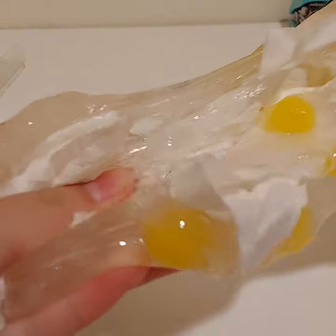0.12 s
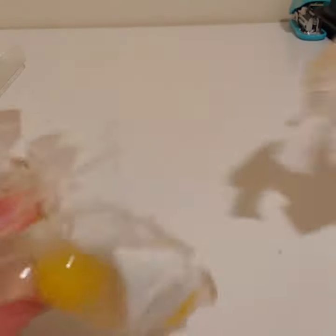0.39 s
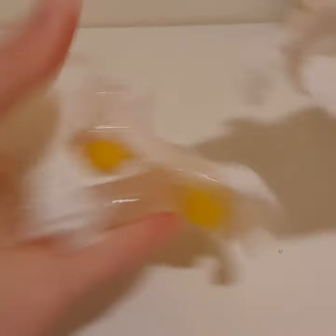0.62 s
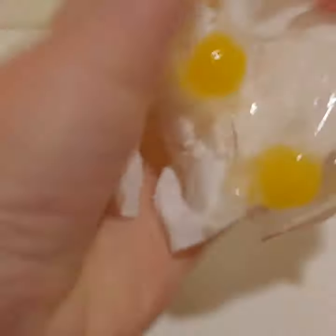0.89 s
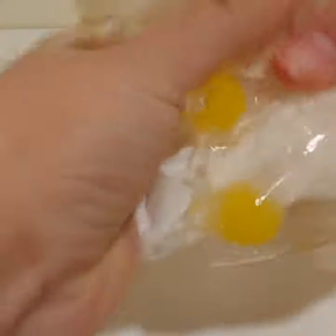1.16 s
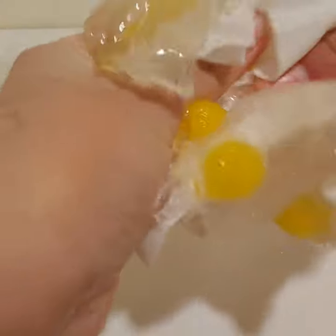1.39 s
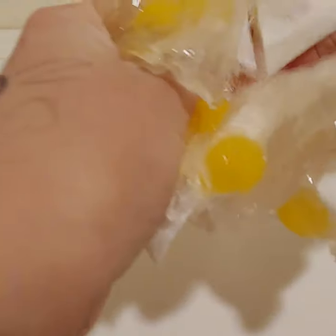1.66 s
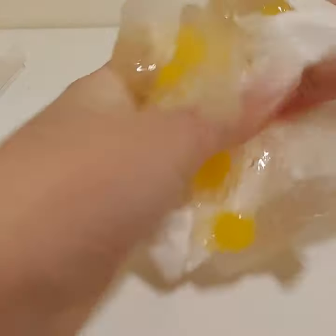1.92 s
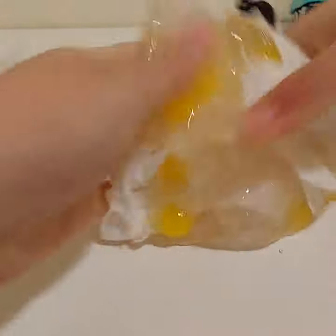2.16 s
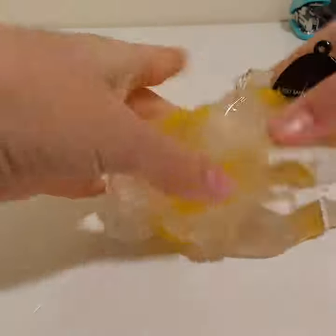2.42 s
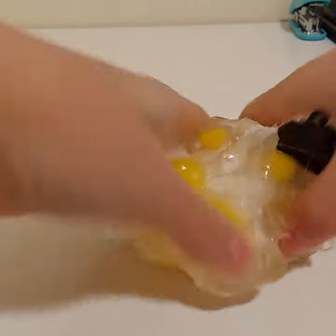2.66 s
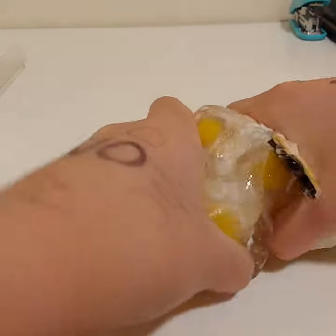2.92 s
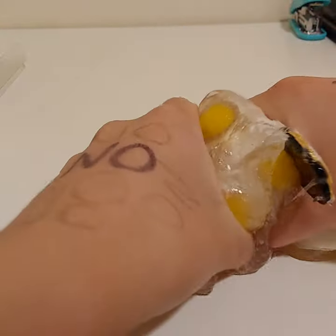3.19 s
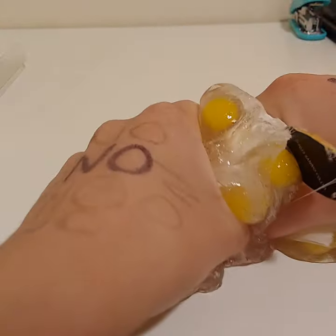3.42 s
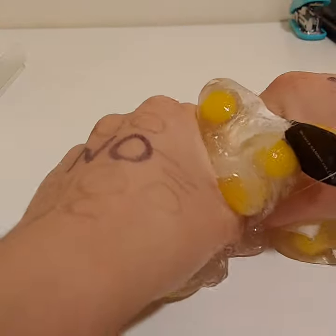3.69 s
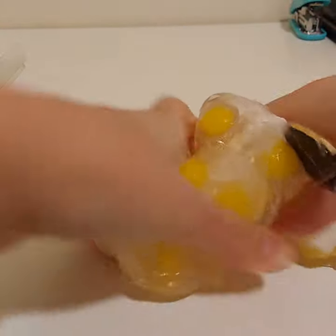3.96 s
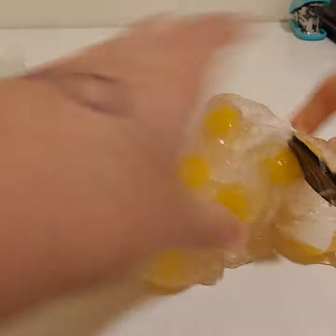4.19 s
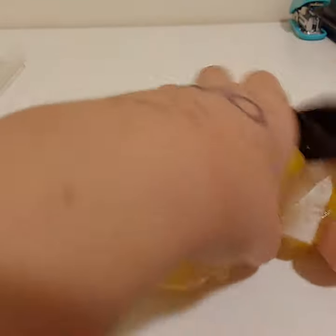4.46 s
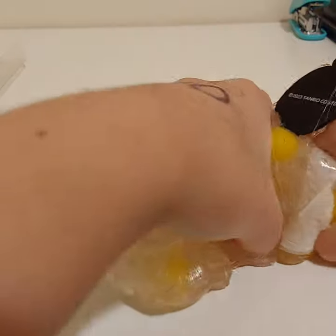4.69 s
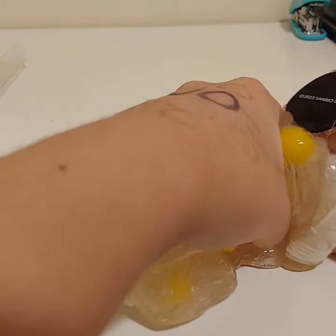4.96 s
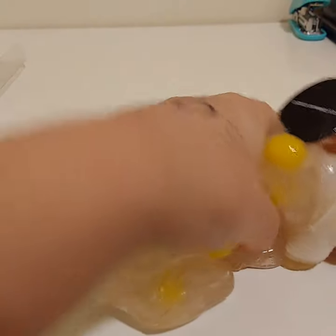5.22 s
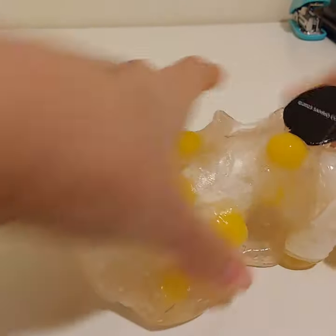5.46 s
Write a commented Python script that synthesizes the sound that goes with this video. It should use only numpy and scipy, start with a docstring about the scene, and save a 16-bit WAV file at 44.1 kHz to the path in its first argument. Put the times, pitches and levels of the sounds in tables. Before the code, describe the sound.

A close, dry stereo pickup of hands kneading firm slime and tissue on a desk in a quiet room, with a faint unsteady low hum near 90 Hz. The first second is soft: a brief squelch and rustle around 0.3 s, barely audible squeaks, then a lull. From 1 to 2 s come papery crinkles and irregular sticky clicks, strongest at 1.27 and 1.45 s. Squishes and a low desk thud follow at 2.4 s, then lighter ticking. Bright snaps and paper crackle cluster at 3.2-3.3 s. At about 3.91 s an air pocket bursts in rapid ringing cracks with a hollow thump, trailing wet bubbles and squelches until 4.2 s. A very sharp snap strikes at 4.61 s, with crisp clicks around 4.75 s and a tiny rising squeak at 4.86 s. Low air puffs buffet the right side near 5.2 s; dense sticky squelching, crackles and desk rumble finish.

```python
"""Two hands knead tissue into firm slime on a desk, close to a phone with two microphones.
From the start a wavering tone hums in the house over still air, and shaped noise and tiny damped tones make the
slime squelch, paper rustle and desk shake; two faint squeaks are gliding tones. Noise bursts make sticky skin click,
with room tails; then bubbles ring, presses set off the desk's tones and slow swings rock the desk. Late on,
an air pocket pops in ringing cracks, one more squeak is heard and slow swings of air buffet the right port."""
import sys
import numpy as np
from scipy import signal
from scipy.fft import rfft, irfft, next_fast_len
from scipy.io import wavfile
from scipy.ndimage import uniform_filter1d, map_coordinates

SR = 44100
rng = np.random.default_rng(int(sys.argv[2]) if len(sys.argv) > 2 else 0)


def unload_wav(signal):
    """Save mono or channel-first audio to the path in sys.argv[1] as 16-bit WAV at rate SR, clipped to [-1, 1]."""
    wavfile.write(
        sys.argv[1],
        SR,
        np.round(np.clip(np.atleast_2d(signal).T, -1, 1) * 32767).astype(np.int16),
    )


def volts_from_db(level):
    """Convert decibel levels to linear amplitude ratios."""
    exponent = np.asarray(level, float) / 20
    return 10 ** exponent


N = 246519  # samples, about 5.6 s

# tones at which the desk top rings: f/Hz, width/Hz, relative level/dB
DESK_MODES = [(65, 29, -4), (183, 32, -1.5), (253, 35, -6), (346.7, 18, -1.5), (429.3, 17.7, -9.5),
              (527.7, 15.6, -14), (709, 15, -14)]


def unit(x):
    """Scales x to an rms of 1."""
    return x / np.sqrt(np.mean(x ** 2) + 1e-20)


def along(points, hz):
    """Reads a curve of (f/Hz, value) points on a log frequency axis."""
    f, v = np.transpose(points)
    return np.interp(np.log(hz + 1), np.log(f + 1), v)


def wobble(rate):
    """A smooth random curve with rate knots a second."""
    knots = rng.standard_normal(int(N * rate / SR) + 4)
    return map_coordinates(knots, [np.arange(N) * rate / SR])


def resonance(f, hz, width_hz):
    """Response of one resonance, which rings only after it is struck."""
    return 1j * f * width_hz / (hz * hz - f * f + 1j * f * width_hz + 1e-9)


def modes(table):
    """Response of several resonances together, with alternating signs."""
    return lambda f: sum((-1) ** k * volts_from_db(db) * resonance(f, hz, w) for k, (hz, w, db) in enumerate(table))


def filtered(x, response):
    """Multiplies the spectrum of x by a response of frequency."""
    m = next_fast_len(x.shape[-1] + 8192)
    return irfft(rfft(x, m) * response(np.fft.rfftfreq(m, 1 / SR)), m)[..., :x.shape[-1]]


def shaped(spectrum):
    """Turns a table of f/Hz, level/dB into a gain of frequency."""
    return lambda f: volts_from_db(along(spectrum, f))


def rush(response, patchy_db):
    """Stereo noise with patches of random gain in time and pitch; its shared part has an rms of 1."""
    # how alike left and right are: f/Hz, likeness (1 = the same, 0 = unrelated)
    alike = [(60, 0.77), (180, 0.92), (550, 0.54), (1650, -0.097), (4970, -0.015), (15000, -0.008)]
    noise = rng.standard_normal((2, N))
    z = signal.stft(noise, nperseg=512)[2]
    field = uniform_filter1d(rng.standard_normal(z.shape[1:]), 6, 0)
    field = uniform_filter1d(field, 8, 1)
    pair = signal.istft(z * volts_from_db(patchy_db * unit(field)), nperseg=512)[1][:, :N]
    # this angle splits the noise into a shared and an opposed part
    turn = lambda f: np.arccos(np.clip(along(alike, f), -1, 1)) / 2
    mid, side = filtered(pair, lambda f: response(f) * [np.cos(turn(f)), np.sin(turn(f))])
    return np.array([mid + side, mid - side]) / np.sqrt(np.mean(mid ** 2))


def ticks(level_db, low_hz, high_hz, rate, cycles):
    """Scattered tiny bubbles and fibres snapping: damped sines of random pitch, size and side."""
    draw = rng.random((int(rate * N / SR), 4))
    start = (draw[:, 0] * (N - 256)).astype(int)
    hz = low_hz * (high_hz / low_hz) ** draw[:, 1:2]
    t = np.arange(256) / SR
    size = volts_from_db(level_db[start, None] + 9.9 * draw[:, 2:3] ** 2)
    grain = size * np.sin(2 * np.pi * hz * t) * np.exp(-hz * t / cycles)
    where = (start[:, None] + np.arange(256)).ravel()
    side = volts_from_db(10 * (draw[:, 3:4] - .5))
    return np.array([np.bincount(where, (grain * g).ravel(), N) for g in (side, 1 / side)])


def add(out, s, sound):
    """Adds a sound to out at time s in seconds."""
    start = max(round(s * SR), 0)
    out[:, start:start + sound.shape[-1]] += sound[..., :N - start]


def together(*levels_db):
    """Level of unrelated sounds heard at once: their powers add."""
    return 10 * np.log10(sum(10 ** (np.asarray(db) / 10) for db in levels_db))


def strokes(table):
    """Level curves of hand strokes, each rising to its peak and falling at its own pace."""
    let_go = 1.3  # the loss in dB grows with this power of the time from the peak
    t = np.arange(0, N + 64, 64) / SR
    s, rise, fall, *peaks = np.transpose(table)[..., None]
    distance = np.where(t < s, (s - t) / np.abs(rise), (t - s) / np.abs(fall))
    loss_db = 10 * distance ** let_go
    return [np.interp(np.arange(N) / SR, t, together(*np.maximum(db - loss_db, -200))) for db in peaks]


def curves(rows):
    """One value per sample for each column after the time."""
    s, *cols = np.transpose(rows)
    return [np.interp(np.arange(N) / SR, s, c) for c in cols]


def hum():
    """A low hum in the house: a tone of unsteady pitch with narrow noise, swelling and fading."""
    # resonances of the noise in the hum: f/Hz, width/Hz, relative level/dB
    hum_modes = [(88.6, 3.8, 0), (129, 5.9, -3.5)]
    # how the hum swells and fades: t/s, level/dB
    hum_level = [(0, -45), (.31, -46), (.378, -59), (.458, -49.5), (.69, -46.5), (.78, -61.5),
                 (.858, -44.5), (.984, -63.5), (1.176, -44), (1.27, -71), (1.518, -40.5), (1.612, -53),
                 (1.75, -44.5), (1.97, -50), (2.08, -43.5), (2.13, -56.5), (2.256, -41.5), (2.375, -77),
                 (2.4, -39), (2.525, -44.5), (2.603, -58.5), (2.95, -57), (3.088, -53.5), (3.473, -52.5),
                 (3.64, -59), (3.67, -44), (3.86, -57.5), (4.012, -43), (4.275, -49), (4.43, -47),
                 (4.77, -55), (4.859, -48), (5.2, -60.5), (5.474, -34), (5.59, -51)]
    tone_hz, waver_hz, noise_db = 88.6, 2.53, -5.5
    level_db, = curves(hum_level)
    tone = np.sin(2 * np.pi * np.cumsum(tone_hz + waver_hz * wobble(6)) / SR)
    noise = rush(lambda f: modes(hum_modes)(f) * resonance(f, 69, 114), patchy_db=0.5)
    return volts_from_db(level_db) * (1.17 * tone + volts_from_db(noise_db) * noise)


def still_air():
    """The still air of the room: a steady, mostly deep noise."""
    # colour of the noise: f/Hz, relative level/dB
    air_colour = [(15, -59), (25, -10), (92, -5), (192, -24), (349, -51), (878, -86), (7710, -68),
                  (15200, -81), (16500, -87)]
    return volts_from_db(-61) * rush(shaped(air_colour), patchy_db=5.0)


def shaking_desk(desk_db):
    """The desk top shakes: noise rings its tones, over a deeper rumble that follows the shaking."""
    # colour of the rumble: f/Hz, relative level/dB
    rumble_colour = [(20, -32), (35, 4), (52, 14), (70, 3), (95, -56)]
    rumble_db = together(desk_db - 29, -87)  # the second level is the rumble at rest
    shiver_db = 1.5 * wobble(30)
    desk = rush(lambda f: modes(DESK_MODES)(f) * resonance(f, 88, 440), patchy_db=-3.0)
    rumble = rush(shaped(rumble_colour), patchy_db=4)
    return volts_from_db(desk_db + shiver_db) * desk + volts_from_db(rumble_db) * rumble


def slime(squelch_db, smack_db, flutter):
    """Wet slime: squelching and smacking noise, with a froth of tiny bubbles and sticky ticks."""
    # colour of the squelch: f/Hz, relative level/dB
    squelch_colour = [(220, -31), (400, -3), (600, 0), (950, -2), (1300, -3.5), (1700, -7), (2400, -11),
                      (4000, -76)]
    # colour of the smack: f/Hz, relative level/dB
    smack_colour = [(800, -12), (1500, -8), (2300, -1.5), (3200, -6), (4300, -10.5), (7000, -41)]
    squelch_gain = volts_from_db(squelch_db - 1.75 + 2.0 * flutter + 1.4 * wobble(11))
    squelch = squelch_gain * rush(shaped(squelch_colour), patchy_db=2.2)
    smack_gain = volts_from_db(smack_db + 1.6 * flutter + 0.36 * wobble(28))
    smack = smack_gain * rush(shaped(smack_colour), patchy_db=2.2)
    froth = ticks(squelch_db - 0.5, 295, 1890, rate=110, cycles=1.33)
    fine_froth = ticks(smack_db + 0.5, 1330, 5300, rate=81, cycles=1.3)
    sticky = ticks(smack_db + 3, 1800, 8000, rate=180, cycles=.8)
    return squelch + smack + froth + fine_froth + sticky


def paper(rustle_db, hiss_db, flutter):
    """Crumpling paper: rustling noise and a finer hiss, with tiny ticks of snapping fibres."""
    # colour of the rustle: f/Hz, relative level/dB
    rustle_colour = [(2000, -21), (3500, -7), (4800, 3.5), (6200, 4.5), (7600, 3), (9000, -47),
                     (12000, -52)]
    # colour of the fine hiss: f/Hz, relative level/dB
    hiss_colour = [(6000, -17), (8200, 6), (10500, 1), (13000, -1.5), (15500, -3.5), (16500, -41)]
    rustle_gain = volts_from_db(rustle_db + 2.05 * flutter + 0.22 * wobble(4.8))
    rustle = rustle_gain * rush(shaped(rustle_colour), patchy_db=1.4)
    hiss_gain = volts_from_db(hiss_db + 2.2 * flutter + 1.2 * wobble(27.93))
    hiss = hiss_gain * rush(shaped(hiss_colour), patchy_db=1.4)
    fibres = ticks(rustle_db + 3.5, 3800, 8000, rate=160, cycles=2.5)
    fine_fibres = ticks(hiss_db + .1, 9000, 15000, rate=120, cycles=2.2)
    return rustle + hiss + fibres + fine_fibres


def kneading():
    """The hands move slime, desk and paper: strokes and light handling set all their levels."""
    # squeezes of the slime (rise and fall cover the top 10 dB):
    # peak t/s, rise/s, fall/s, squelch level/dB, desk shaking level/dB, smack level/dB
    squeezes = [(.19, 0.05, 0.059, -61, -63, -62.5), (.245, 0.016, 0.053, -56.5, -55, -54),
                (.295, 0.05, 0.036, -53, -51.5, -55), (.83, 0.017, 0.038, -66, -70, -56),
                (.984, 0.048, 0.055, -57, -53.5, -53), (1.27, 0.49, 0.19, -80, -69, -59),
                (1.45, 0.0031, 0.23, -57, -58, -56.5), (1.72, 0.14, 0.07, -82, -81, -56.5),
                (1.885, 0.016, 0.25, -56, -53, -51), (2.065, 0.12, 0.02, -50, -65, -55),
                (2.256, 0.093, 0.14, -55.5, -49.5, -61.5), (2.388, 0.0051, 0.095, -49, -39.5, -50.5),
                (2.45, 0.0086, 0.044, -60, -50, -43.5), (2.525, 0.024, 0.083, -49, -48, -49),
                (2.96, 0.0015, 0.16, -53.5, -43.5, -59.5), (3.21, 0.0013, 0.58, -70, -67, -57),
                (3.285, 0.066, 0.1, -63, -47.5, -54.5), (3.66, 0.001, 0.069, -51, -47, -71),
                (3.76, 0.037, 0.041, -55, -52, -58.5), (3.87, 0.0041, 0.32, -48, -35.5, -47.5),
                (3.93, 0.019, 0.063, -25.5, -36, -33.5), (3.99, 0.017, 0.057, -32, -29, -37.5),
                (4.06, 0.081, 0.089, -38, -33, -45), (4.12, 0.055, 0.047, -48, -34, -45),
                (4.285, 0.0014, 0.093, -51, -45, -61), (4.424, 0.0013, 0.14, -48, -37, -54),
                (4.545, 0.012, 0.069, -44.5, -35, -46), (4.64, 0.013, 0.075, -48, -47, -49),
                (4.69, 0.059, 0.078, -62, -43, -52.5), (4.78, 0.0036, .1, -73, -75, -53),
                (4.86, 0.048, 0.1, -50.5, -47.5, -57.5), (5.147, 0.15, 0.11, -59, -53, -88),
                (5.225, 0.02, 0.12, -47, -41, -50.5), (5.31, 0.014, 0.13, -45, -36, -46.5),
                (5.36, 0.064, 0.06, -39, -31.5, -41.5), (5.45, 0.033, 0.091, -50.5, -35.5, -49.5)]
    # crumples of the paper (rise and fall as above): peak t/s, rise/s, fall/s, rustle level/dB, hiss level/dB
    crumples = [(.195, 0.034, .04, -62, -71), (.24, .02, 0.043, -57.5, -61), (.295, 0.053, 0.04, -55, -59),
                (.458, 0.016, 0.25, -63, -67.5), (.96, 0.05, 0.071, -55, -62),
                (1.08, 0.038, 0.088, -64, -71), (1.21, 0.034, 0.035, -56.5, -59),
                (1.27, 0.0033, 0.054, -47, -51), (1.452, .003, 0.0082, -40, -47),
                (1.5, 0.031, 0.04, -54.5, -57.5), (1.61, 0.056, 0.15, -58, -63),
                (1.878, 0.0071, 0.4, -55.5, -60), (1.97, 0.1, 0.064, -57.5, -62),
                (2.256, 0.095, 0.094, -59.5, -63), (2.386, 0.0014, 0.053, -56.5, -65.5),
                (2.446, 0.0011, 0.094, -43.5, -49.5), (2.53, 0.017, 0.056, -56, -63),
                (2.98, 0.0031, 0.044, -56, -49), (3.025, 0.038, 0.05, -56.5, -52.5),
                (3.2, 0.072, 0.19, -59, -73), (3.28, 0.031, 0.016, -45, -70),
                (3.296, 0.0021, 0.062, -36, -44.5), (3.56, .01, .08, -71, -67),
                (3.76, 0.13, 0.034, -61.5, -67.5), (3.87, 0.0019, 0.15, -51.5, -56),
                (3.93, 0.049, 0.067, -48, -53), (3.995, 0.032, 0.048, -44.5, -43.5),
                (4.1, 0.084, 0.053, -42.5, -51), (4.19, 0.017, .015, -79, -62),
                (4.285, 0.0013, 0.12, -65.5, -72), (4.424, 0.00088, 0.033, -55, -75),
                (4.44, .006, 0.048, -49, -51.5), (4.545, 0.025, 0.067, -52, -55.5),
                (4.625, 0.0079, 0.059, -43.5, -45), (4.67, 0.035, 0.073, -45.5, -58),
                (4.8, 0.018, 0.069, -42, -43.5), (4.865, 0.024, 0.034, -48.5, -46.5),
                (5.25, 0.029, 0.1, -52, -59), (5.35, 0.054, 0.099, -45, -51.5),
                (5.44, 0.043, 0.05, -50, -55.5), (5.51, .03, 0.043, -53, -60)]
    # light handling between strokes: t/s, squelch level/dB, desk shaking level/dB, rustle level/dB, hiss level/dB
    handling = [(0, -71, -65, -73.5, -79), (.15, -75, -69, -70, -74), (.4, -74.5, -68, -74, -76),
                (.78, -99, -66, -89, -96), (.8, -63.5, -66, -62.5, -69), (1.1, -59.5, -60, -59.5, -67),
                (1.7, -79, -67, -60, -72), (1.86, -96, -73, -78, -91), (2.03, -73, -46, -64, -58),
                (2.1, -104.5, -63, -75.5, -80), (2.6, -64, -61.5, -71, -76),
                (2.8, -56.5, -58.5, -63, -66.5), (3.15, -62, -53, -66, -77),
                (3.45, -65.5, -54.5, -62, -72.5), (3.85, -69, -67, -88, -79), (4.2, -73, -56, -63, -84.5),
                (4.27, -76, -60.5, -73, -85), (4.42, -85, -65, -86, -88), (4.45, -62, -59, -68, -70),
                (4.6, -66, -54, -60, -77), (5.0, -64, -65, -63.5, -73), (5.19, -81, -60, -71, -81),
                (5.59, -82, -48, -70, -78)]
    *squeeze_db, smack_db = strokes(squeezes)
    light = curves(handling)
    squelch_db, desk_db, rustle_db, hiss_db = map(together, squeeze_db + strokes(crumples), light)
    # light squelching and all rustling each bring some smack
    smack_db = together(smack_db, light[0] - 3, rustle_db - 22.5)
    # uneven grip and quick stick-slip, shared by slime and paper
    grip, stick = wobble(22), wobble(110)
    flutter = .45 * grip + .75 * stick
    return shaking_desk(desk_db) + slime(squelch_db, smack_db, flutter) + paper(rustle_db, hiss_db, flutter)


def squeaks():
    """Stretching slime squeaks faintly: narrow wavering tones that swell and fade."""
    # squeaks: start t/s, end t/s, first f/Hz, last f/Hz, level/dB, roughness (0-1)
    squeak_list = [(0, 0.18, 2600, 2590, -72.5, 0.46), (0.594, 0.72, 1740, 1790, -72.5, 0.65),
                   (4.857, 4.872, 1920, 2200, -44, 0.3)]
    out = np.zeros((2, N))
    for start, end, first_hz, last_hz, db, rough in squeak_list:
        u = np.linspace(0, 1, round((end - start) * SR))
        glide_hz = first_hz + (last_hz - first_hz) * u
        phase = 2 * np.pi * np.cumsum(glide_hz) / SR + 3 * rough * wobble(255)[:len(u)]
        swell = np.sqrt(np.sin(np.pi * u) + 1e-9)
        add(out, start, volts_from_db(db) * swell * np.sin(phase)[None])
    return out


def echo(burst, length):
    """A fresh room tail: the phone's gain dips for a moment, then the tail swells, each frequency
    dying at its own speed."""
    # how long the room rings: f/Hz, time to fall by 60 dB/s
    room_decay = [(500, 0.41), (2000, 0.15), (6000, 0.26), (14000, 0.22)]
    hz, t, z = signal.stft(rng.standard_normal((2, length)), SR, nperseg=256)
    fading = z * volts_from_db(-60 * t / along(room_decay, hz)[:, None])
    tail = signal.istft(fading, SR, nperseg=256)[1][:, :length]
    tail = tail * np.clip((np.arange(length) / SR - .004) / 0.025, 0, 1)  # the dip, then the swell
    return signal.fftconvolve(burst, tail / np.linalg.norm(tail[0]), axes=1)[:, :length]


def clicks():
    """Sticky skin lets go: a sharp snap and tiny crackle ring a small cavity, with a room tail."""
    # releases: t/s, level/dB, cavity f/Hz, bright edge level against the body/dB, left against right/dB
    releases = [(.1364, -41.5, 6400, -12, -8), (.2342, -46, 6000, 15, 18), (.2701, -49, 6000, 10, -3),
                (0.949, -38, 4200, -20, -12), (1.0732, -31, 6100, -13, 10), (1.1, -38, 6000, -10, -6),
                (1.068, -43.5, 2460, 13, -4), (1.2211, -38.5, 1320, -30, 1), (1.2689, -15, 6900, -19, 1),
                (1.2682, -29, 1520, -18, 5), (1.388, -40, 7100, 2, -5), (1.449, -19.5, 5460, -6, -11.5),
                (1.4604, -38, 5240, -8, -2), (1.4704, -31, 6500, 2, -1), (1.483, -31, 5200, -15, -4),
                (1.491, -37, 7000, -2, 2), (1.5, -28, 6500, 5, -1), (1.511, -34, 6080, -1, -4),
                (1.537, -35, 7600, 13.5, 1.5), (1.575, -27, 5400, -3, -6), (1.5826, -31, 6100, 0, 0),
                (1.6113, -29.5, 2190, -25, -7), (1.613, -29.5, 6000, -15, -11), (1.617, -34, 2200, -20, -4),
                (1.6292, -32, 4670, -24, -9), (1.643, -32, 2240, -21, -10), (1.6488, -27, 6240, -3, -6),
                (1.6506, -35, 2090, -25, -8), (1.675, -42, 1900, -10, -3), (1.68, -42, 1800, -9.5, -8),
                (1.7048, -49, 3500, -20, -6), (1.72, -25, 2650, -24, -5), (1.7198, -29.5, 6570, -17, -6),
                (1.7257, -37.5, 1920, -3, -6), (1.9001, -24.5, 2660, -22, -7), (1.943, -34, 3160, -25, -4),
                (2.049, -26.5, 2300, -28, -5), (2.2422, -35, 5300, -22, 5), (2.389, -38, 2610, -28, 2),
                (2.445, -25, 7140, -27, 5), (2.4607, -43, 1960, -18, -8), (2.509, -26, 5280, -4, 1),
                (2.5617, -36.5, 1500, -8, -11), (2.6377, -47, 6500, -7, -5), (2.7105, -50, 2960, 9, 0),
                (2.726, -39.5, 3500, -1, -3), (2.7709, -37, 1130, -20, 7), (2.823, -42, 3000, 5, 3),
                (2.8333, -32, 1720, -18, 3), (2.8626, -39, 7500, 1, 2), (2.891, -37, 1790, -20, 11),
                (2.9543, -37, 2090, -21, 6), (2.965, -33, 6500, 0.5, 1), (2.9785, -21.5, 8100, 8.5, 4.5),
                (3.027, -34, 7300, -11, -13), (3.1163, -31, 2250, 5, 3), (3.169, -36.5, 5730, -26, -13),
                (3.211, -24, 3380, -27, 11), (3.215, -20.5, 7240, -13, -2), (3.261, -18, 8700, -18, 7),
                (3.271, -30, 6600, -15, 0), (3.277, -23.5, 2980, -10, 11.5), (3.276, -17, 7500, -11, -9),
                (3.294, -17, 5930, -35, 4), (3.2948, -18, 5700, 7, -16), (3.311, -23, 6900, -17, -4),
                (3.4743, -41, 4000, 0, 6), (3.547, -40, 2760, 1, 1), (3.5614, -34, 6900, 4, 1.5),
                (3.6875, -38.5, 1240, -1, 1), (3.6943, -32, 6150, -20, -5), (3.7207, -19.5, 4750, -17, 2),
                (3.761, -20, 2570, -20, 7), (3.766, -18.5, 6350, -17, -5), (3.8708, -28, 890, -13, 5),
                (3.903, -20, 2800, -25, 2), (4.1937, -44, 2980, 8, 0), (4.4222, -36, 1100, -35, 4),
                (4.437, -26, 2380, 1, 0), (4.5093, -20.5, 5000, 3.5, 2.5), (4.5862, -34, 2800, -24, -3),
                (4.613, -4.5, 5300, -1, 2.5), (4.626, -36, 7000, 16, 0), (4.736, -17, 5330, -9, 6),
                (4.7729, -15, 7750, 10.5, 0), (4.7727, -28, 1430, -20, 5), (4.9336, -36.5, 5000, 9.5, 5),
                (5.005, -34, 2660, -1.5, 6), (5.0154, -39, 1820, -30, 4), (5.0286, -36.5, 5000, 3, 2),
                (5.101, -28.5, 7160, -23, 2.5), (5.161, -45, 1500, -9, -2),
                (5.1802, -40.5, 1530, -27, -22.5), (5.18, -40.5, 5800, -25, -27),
                (5.2019, -41, 5500, 3, -3), (5.2188, -40, 1180, 7, -7), (5.238, -30.5, 2870, -13, -14),
                (5.299, -29.5, 2960, 2, 10), (5.306, -33, 2000, -20, 9), (5.3158, -23, 2500, 2, 6),
                (5.327, -24, 2080, -13, 6), (5.34, -25, 2800, -13, 4), (5.345, -19, 5900, -8, 4),
                (5.377, -30, 2500, -12, 12), (5.393, -26.5, 3700, -10, 2), (5.4576, -31, 2200, -12, 2),
                (5.49, -31, 2400, -12, 0)]
    snap = 3  # height of the first snap, on the scale of the crackle
    out, t = np.zeros((2, N)), np.arange(768) / SR
    peak_one = lambda x: x / np.abs(x).max()
    for s, db, hz, edge_db, pan_db in releases:
        shared, *own = rng.standard_normal((3, len(t)))
        decay = .5 * volts_from_db(-60 * t / .008) + .08 * volts_from_db(-60 * t / .03)
        crackle = (.6 * shared + np.array(own)) * decay
        crackle[[0, 1], rng.integers(0, 8, size=2)] = snap  # reaches each port at its own moment
        # stronger clicks have more broad low body; its sign keeps it in step with the cavity between the two
        low = (.5 + .009 * db) * (.5 if hz < 3000 else -1)
        body = filtered(crackle, lambda f: resonance(f, hz, .7 * hz) ** 2 + low * resonance(f, 2100, 2800) ** 2)
        edge = filtered(crackle, lambda f: resonance(f, 11960, 8100) ** 2)
        side = volts_from_db(pan_db * np.array([[.5], [-.5]]))
        burst = volts_from_db(db) * (side * peak_one(body) + volts_from_db(edge_db) * peak_one(edge))
        add(out, s + .0006, burst)
        add(out, s, volts_from_db(-13) * echo(burst, length=SR // 3))
    return out


def bubbles():
    """Air bubbles burst in the slime: each rings a few cycles, its pitch rising as it opens."""
    # bubbles: t/s, level/dB, f/Hz, cycles of ringing
    bubble_list = [(0.971, -40.5, 1340, 6.6), (0.998, -35.5, 850, 2.5), (0.987, -52, 260, 1.1),
                   (0.999, -43, 450, 1.3), (1.011, -43.5, 415, 2), (1.024, -44, 280, 1.4),
                   (1.976, -45, 2830, 2.5), (2.005, -37.5, 1370, 4.7), (2.012, -39, 915, 2.4),
                   (2.027, -36, 930, 2.2), (2.053, -36, 1350, 6), (2.062, -33, 1010, 3.3),
                   (2.069, -46, 1020, 4.3), (2.396, -33, 258, 0.77), (2.52, -40, 385, 1.5),
                   (2.522, -45, 950, 2.5), (3.2605, -31, 704, 1.9), (3.395, -29.5, 2150, 1),
                   (3.935, -16.5, 712, 3.8), (3.953, -18, 910, 4), (3.963, -23, 532, 6.2),
                   (4.002, -22.5, 377, 2.1), (4.007, -23, 2150, 6.6), (4.026, -31, 275, 1.8),
                   (4.045, -25.5, 228, 1.6), (4.141, -31, 590, 2.3), (4.068, -30, 400, 0.85),
                   (4.125, -24.5, 301, 2), (4.593, -36, 1290, 2.9), (4.6425, -39, 1370, 2.4),
                   (4.668, -25, 1480, 1.3), (4.701, -26, 4840, 5), (4.873, -32.5, 1250, 2),
                   (5.316, -33, 1350, 4.4), (5.457, -31, 326, 2.7)]
    out, t = np.zeros((2, N)), np.arange(1500) / SR
    for s, db, hz, cycles in bubble_list:
        age = hz * t / cycles
        ring = np.sin(2 * np.pi * hz * t * (1 + 0.0046 * age)) * np.exp(-age) * (1 - np.exp(-6 * age))
        # a wet, ragged rim
        ring = ring * (1 + .6 * np.array([wobble(900)[:len(t)], wobble(900)[:len(t)]]))
        add(out, s, volts_from_db(db) * ring / np.abs(ring).max() * volts_from_db([[1.5], [-1.5]]))
    return out


def presses():
    """A soft push sets the desk's tones ringing, at new strengths each time."""
    # presses against the desk: t/s, level/dB
    press_list = [(2.172, -42.5), (2.225, -44), (2.387, -43), (2.445, -46), (2.771, -45), (2.954, -37),
                  (3.209, -32.5), (3.258, -34), (3.369, -39), (3.656, -39.5), (3.86, -52), (3.914, -18),
                  (4.122, -34), (4.284, -45), (4.424, -32.5), (4.526, -42), (4.815, -39), (5.459, -39)]
    out, t = np.zeros((2, N)), np.arange(SR // 5) / SR
    for s, db in press_list:
        ring = 0
        for hz, width_hz, level_db in DESK_MODES:
            strength = volts_from_db(level_db + rng.normal(0, 0.69))
            ring = ring + strength * np.exp(-np.pi * width_hz * t) * np.sin(2 * np.pi * hz * t)
        ring = ring * (1 - np.exp(-t / 0.0031))  # soft start
        add(out, s, volts_from_db(db) * ring[None] / np.abs(ring).max())
    return out


def swing(rows):
    """Slow waves, each swelling and fading in a smooth bell around its centre."""
    t = np.arange(N) / SR
    return sum(volts_from_db(db) * np.exp(-((t - s) / half) ** 2) * np.cos(2 * np.pi * hz * (t - s))
               for s, db, hz, half in rows)


def rocks():
    """The whole desk rocks and swings both microphones alike."""
    # rocking: centre t/s, level/dB, f/Hz, half length/s
    rock_list = [(2.41, -38, 59.4, 0.017), (2.475, -36.5, 66, .035)]
    return swing(rock_list)


def pop():
    """The air pocket cracks open in steps, and its cavity mostly rings lower as it widens."""
    # cracks of the pocket: t/s, level/dB, cavity f/Hz, time to fall by 60 dB/s
    cracks = [(3.91, -16, 1000, 0.0053), (3.912, -11, 920, 0.0085), (3.9158, -6, 1010, 0.0045),
              (3.917, -7, 880, 0.047), (3.922, -15.5, 705, 0.11)]
    out, t = np.zeros((2, SR // 4)), np.arange(SR // 8) / SR
    first = cracks[0][0]
    for s, db, hz, t60 in cracks:
        lag = np.array([[0], [2.2]]) * np.clip(t / 0.0045, 0, 1)  # radians: the ports hear it out of step
        phase = 2 * np.pi * hz * t + lag + 0.99 * wobble(300)[:len(t)]
        ring = np.sin(phase) * volts_from_db(np.array([[1.5], [-1.5]]) - 60 * t / t60)
        crack = 2.0 * rng.standard_normal((2, len(t))) * volts_from_db(-60 * t / 0.01)
        crack = filtered(crack, lambda f: resonance(f, 2630, 3400) ** 2 + 0.17 * resonance(f, 11600, 8300))
        add(out, s - first, volts_from_db(db) * (ring + crack))
    whole = np.zeros((2, N))
    add(whole, first, out + volts_from_db(-11.5) * echo(out, length=SR // 4))
    return whole


def puffs():
    """Air pushed by the hand swings the right microphone, and the left one hardly at all."""
    # puffs of air: centre t/s, level/dB, f/Hz, half length/s
    puff_list = [(4.535, -20, 161, 0.0031), (5.15, -21, 129, 0.0039), (5.171, -15, 83, 0.0078),
                 (5.183, -17.5, 315, 0.00075), (5.189, -10, 83.7, 0.0094), (5.235, -19.5, 150, 0.0035)]
    return swing(puff_list) * np.array([[.03], [1]])


def scene():
    """Everything on the desk, over the hum and the still air of the room."""
    # balance of the two ports: f/Hz, left against right/dB
    port_balance = [(60, 1.5), (120, 0), (240, 1), (480, 1), (950, 1.5), (1890, -1.5), (3770, -4.5),
                    (7520, -3.5), (15000, 16.5)]
    steady = filtered(hum() + kneading() + still_air() + pop(),
                      lambda f: volts_from_db(along(port_balance, f) * np.array([[.5], [-.5]])))
    # the right port is dull in the high treble
    bright_left = lambda f: volts_from_db(np.clip((f - 8300) / 2500, 0, 1) * np.array([[3], [-10]]))
    return steady + filtered(clicks(), bright_left) + squeaks() + bubbles() + presses() + rocks() + puffs()


def band_limit(x):
    """A steep low-pass at the top of the band."""
    return signal.sosfilt(signal.butter(12, 16990, fs=SR, output="sos"), x)


def record(dry):
    """The phone cuts the deepest bass, rounds off the loudest peaks and removes the highest treble."""
    bass_cut = filtered(dry, lambda f: (1j * f / (1j * f + 30)) ** 2)
    rounded = bass_cut / (1 + np.abs(bass_cut / .92) ** 6) ** (1 / 6)
    mix = filtered(rounded, lambda f: f < 16900)
    return band_limit(mix)


dry = scene()
out = record(dry)
unload_wav(out)
```